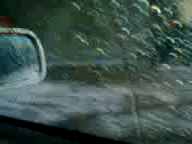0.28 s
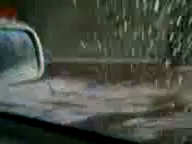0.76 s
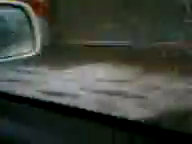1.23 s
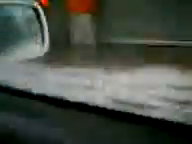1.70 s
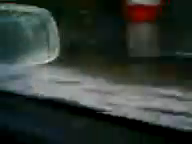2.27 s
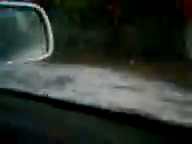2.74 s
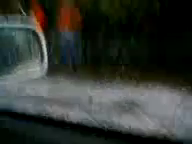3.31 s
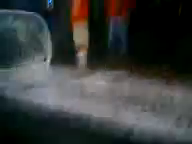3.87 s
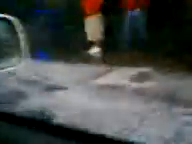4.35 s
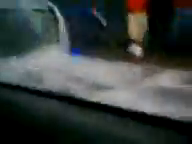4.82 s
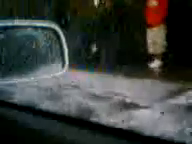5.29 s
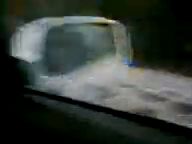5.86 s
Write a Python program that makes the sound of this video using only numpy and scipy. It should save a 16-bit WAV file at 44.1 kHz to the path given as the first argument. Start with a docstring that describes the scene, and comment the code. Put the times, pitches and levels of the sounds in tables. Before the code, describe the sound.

Hail on a car cuts in abruptly at about 0.2 seconds, heard from inside the cabin. Small stones tick densely on the windshield and drum on the padded steel roof over a hollow boom, heaviest during the first second. From about 0.6 to 2.4 seconds, larger stones crack on the glass at irregular moments, each with a short rattle and a dull knock. Some of these hits overload the small microphone, adding bright clicks to an otherwise slightly muffled sound. Around 1.2 seconds, one brief, grainy swish slides down in pitch. The shower eases to a lull near 2.9 seconds, then picks up again in gusty flurries. More hard cracks land between 3 and 3.5 seconds, from 4.1 to 5.2 seconds, and in a quick cluster near 5.9 seconds. The patter continues, a little softer, until the end at about 6 seconds.

```python
"""Hail on a car, heard from inside

Small stones tick on the windshield, drum on the padded steel roof and make the cabin boom.
The sound cuts in on a downpour already under way, which eases to a lull near 2.9 s; gusts add flurries.
The largest stones crack on the glass, with a rattle and a dull knock. One short swish slides down.
A small microphone cuts the treble. Some hard hits overload the recorder, which adds bright clicks."""
import sys
import numpy as np
from scipy import signal
from scipy.fft import rfft, irfft
from scipy.io import wavfile
from scipy.ndimage import uniform_filter1d

SR = 44100
rng = np.random.default_rng(int(sys.argv[2]) if len(sys.argv) > 2 else 0)


def int16_out(signal):
    """Quantize to a 16-bit WAV file."""
    q = np.round(np.clip(np.atleast_2d(signal).T, -1, 1) * 32767)
    wavfile.write(sys.argv[1], SR, q.astype(np.int16))


N = 267687
TIME = np.arange(N) / SR

# How strongly each part of the car answers a blow at each pitch: pitch_hz, level_db
GLASS_TONE = [(200, -32.5), (900, -18.5), (1500, -15.5), (1950, -12), (2250, -0.5), (2500, 0.5),
              (2900, -2.5), (3300, -3.5), (3600, -8), (3900, -20.5), (4300, -30.5), (4700, -59)]
ROOF_TONE = [(60, -25), (300, -12), (600, -2.5), (820, -1.5), (1150, 1.5), (1450, 4), (1780, 2),
             (2100, -4.5), (3000, -8.5), (3700, -18), (4400, -57)]


def small_hail():
    """Small stones tick on the glass and drum on the roof; both shake the air in the cabin."""
    # How strongly the cabin's air answers a blow at each pitch: pitch_hz, level_db
    cabin_tone = [(20, -38.5), (35, -23), (60, -10.5), (110, -6), (200, -5), (300, -1.5), (400, -1.5),
                  (500, 2), (700, -8), (1200, -23.5), (3000, -57)]
    # How the cabin's boom rises and falls: time_s, level_db
    boom_curve = [(0.2, -25), (0.56, -26), (0.63, -31.4), (0.85, -27), (0.99, -37), (1.3, -33.5),
                  (1.48, -36), (1.78, -32), (2.45, -34.4), (2.92, -42.0), (3.35, -33), (3.7, -37),
                  (4.5, -37.5), (4.72, -32.5), (5.15, -34), (5.62, -38.0), (6.06, -39.5)]
    boom_db = np.interp(TIME, *np.transpose(boom_curve)) - 1
    glass_db = shower_level(base_db=-24, follow=1.0, downpour_db=-3) + flurries("glass")
    # At first, heavy stones fall mostly on the roof.
    roof_db = shower_level(base_db=-29, follow=0.91, downpour_db=3.5) + flurries("roof")
    on_glass = impacts(per_s=850, spread_db=4.5, max_spreads=2.7, clump_db=0.5)
    on_roof = impacts(per_s=750, spread_db=4.0, max_spreads=3.12, clump_db=1.5)
    patter = panel(on_glass, GLASS_TONE, uneven_db=6.0, echo_db=0.5, ring_scale=1.0)
    drumming = panel(on_roof + 0.45 * on_glass, ROOF_TONE, uneven_db=5.5, echo_db=1.5, ring_scale=0.9)
    boom = panel(on_roof + 0.2 * on_glass, cabin_tone, uneven_db=2.5, echo_db=0.0, ring_scale=1.1)
    # The roof's hollow main note grows faster than the boom.
    hollow = steady(resonate(boom, pitch_hz=402, width_hz=125))
    hollow_db = -28.5 + 1.78 * (boom_db + 26)
    panels = amp(glass_db) * patter + amp(roof_db) * drumming
    return panels + amp(boom_db) * boom + amp(hollow_db) * hollow


def glass_cracks():
    """A large stone ticks sharply on the glass; the pane rattles and the bodywork gives a dull knock."""
    # Large stones on the glass, with levels trimmed below: start_s, tick_db, rattle_db, knock_db
    stones = [(0.5992, -2, -22, -27), (0.7244, -7, -22, -21), (0.7616, -6, -31, -29),
              (0.7784, -3, -21, -36), (0.8837, -3, -23, -23.5), (0.8897, -2, -22, -30),
              (0.9322, -2, -17, -31), (0.937, -8, -17.5, -37), (0.9475, -5, -14, -32),
              (1.1622, -7, -23, -23), (1.1735, -4, -21, -30), (1.1873, -3, -16, -27),
              (1.2437, -3.5, -24, -24), (1.3837, -6, -17, -18.5), (1.4044, 1, -17.5, -19),
              (1.4446, -6, -15, -28), (1.6469, -1, -15, -21.5), (1.6685, -1.5, -20, -32),
              (1.7751, -5.5, -28, -35), (2.0181, -5, -20, -22.5), (2.0984, -8, -28, -36),
              (2.318, -9, -32, -24.5), (2.3691, -1.5, -19, -41), (3.0702, -5, -19, -29),
              (3.4245, -9, -19.5, -31), (3.488, -4.5, -23, -39), (4.1131, -11, -26.5, -28.5),
              (4.1325, -8, -19.5, -50), (4.18, -10, -19, -27), (4.2904, -16, -18, -29),
              (4.489, -8, -15.5, -26), (4.5292, -6, -19.5, -37), (4.6729, -11, -24, -27),
              (4.7647, -5.5, -21.5, -30), (5.0069, -6, -19, -36), (5.0917, -5, -17, -39),
              (5.1971, -4, -24, -26), (5.2212, -5, -27, -29), (5.867, -8.5, -18.5, -37),
              (5.8935, -6, -26, -27), (5.9137, -4, -14.5, -28)]
    out = np.zeros(N)
    for start_s, tick_db, rattle_db, knock_db in stones:
        contact = tick(pitch_hz=2690, width_s=0.00047)
        add(out, start_s - len(contact) / SR / 2, amp(tick_db + 0.5) * contact)
        add(out, start_s, amp(rattle_db - 2.5) * ring(GLASS_TONE, ring_scale=1.0))
        add(out, start_s, amp(knock_db) * ring(ROOF_TONE, ring_scale=0.87))
    return out


def swish():
    """A grainy crackle swells quickly, then fades as it slides down in pitch."""
    start_s, length_s, ramp_s = 1.17, 0.2, 0.025
    fall_hz_per_s, fade_db_per_s = 12800, 54
    age_s = np.clip(TIME - start_s, 0, length_s)
    grains = impacts(per_s=1300, spread_db=4.0, max_spreads=3.4, clump_db=1.5) * rng.choice([-1, 1], N)
    crackle = resonate(grains, pitch_hz=2480 - fall_hz_per_s * age_s, width_hz=520)
    ramps = np.minimum(np.minimum(age_s, length_s - age_s) / ramp_s, 1)
    return steady(crackle, size=2000) * ramps * amp(-20.5 - fade_db_per_s * age_s)


def overload_clicks():
    """Some of the hardest hits overload the recorder, which adds a short, bright distortion click."""
    # Where the clicks are placed: start_s, peak_db
    overloads = [(0.598, -37), (0.8827, -36), (0.889, -19), (0.9312, -51), (1.4032, -25), (1.4431, -26.5),
                 (1.646, -25.5), (2.0165, -35.5), (2.368, -23.5), (3.4865, -53)]
    # How strong a click is at each pitch: pitch_hz, level_db
    click_tone = [(3000, -28), (4600, -0.5), (6500, -1), (10000, -4), (15500, -11)]
    out = np.zeros(N)
    for start_s, peak_db in overloads:
        click = pulse(click_tone, uneven_db=0.5)
        add(out, start_s + 0.0014, amp(peak_db) * click / abs(click).max())
    return out


def shower_level(base_db, follow, downpour_db):
    """A panel's level in dB follows the shower; the opening downpour shifts it, then dies away."""
    # How hard it hails: time_s, strength_db
    strength = [(0.2, 5), (0.55, 5), (0.93, 3), (1.0, 0.5), (1.2, 0.5), (1.75, 2.5), (2.15, 1.44),
                (2.6, -1), (2.87, -6), (3.0, -6), (3.12, -2.2), (3.45, -1.1), (3.92, -1.5), (4.4, -1.1),
                (4.72, 1.25), (5.25, 1.24), (5.7, -0.5), (6.06, -2.9)]
    hold_s, fade_s = 0.55, 0.28
    downpour = np.exp(-np.maximum(TIME - hold_s, 0) / fade_s)
    return base_db + follow * np.interp(TIME, *np.transpose(strength)) + downpour_db * downpour


def flurries(part):
    """Gusts throw hail at the car, briefly changing the level in dB on the glass or the roof."""
    # One flurry a row: start_s, length_s, glass_change_db, roof_change_db
    gusts = [(0.442, .17, 3.5, 0), (1.164, 0.11, 2.5, -0.5), (1.368, 0.19, 1, 4), (1.65, 0.11, 1.5, -1),
             (2.467, 0.2, 2.5, 2.5), (2.95, .11, -3, 5.5), (3.049, 0.14, 3, 2), (3.39, 0.13, 3, 1),
             (3.576, 0.077, 3.5, 2), (4.475, 0.086, 0.5, -3.5), (4.592, .1, 2, 0.5), (4.699, .1, 0, 2.5),
             (4.868, 0.067, -1.5, 3.5), (5.15, 0.096, 1.5, 2), (5.855, 0.066, 0.5, -0.5),
             (5.961, 0.061, 6, 0.5)]
    ramp_s = 0.015
    change_db = np.zeros(N)
    for start_s, length_s, glass_db, roof_db in gusts:
        inside_s = np.minimum(TIME - start_s, start_s + length_s - TIME)
        change_db += (glass_db if part == "glass" else roof_db) * np.clip(inside_s / ramp_s, 0, 1)
    return change_db


def impacts(per_s, spread_db, max_spreads, clump_db):
    """Blows land at random, many small and few large, in brief louder and softer clumps."""
    slow_filter = signal.butter(2, 28, fs=SR, output="sos")
    clumps = unit(signal.sosfilt(slow_filter, rng.standard_normal(N)))
    size_db = spread_db * np.minimum(rng.exponential(1, N), max_spreads) + clump_db * clumps
    return amp(size_db) * (rng.random(N) < per_s / SR)


def panel(hits, tone, uneven_db, echo_db, ring_scale, spots=32):
    """Blows scatter over a panel; each spot answers with its own pulse and echoes."""
    where = rng.integers(0, spots, N)
    pushes = hits * rng.choice([-1, 1], N)  # each blow pushes in or out at random
    out = np.zeros(N)
    for spot in range(spots):
        paths = amp(echo_db) * echoes(ring_scale)
        paths[0] += 1  # the sound that arrives directly
        blow = signal.fftconvolve(paths, pulse(tone, uneven_db))
        blow /= np.linalg.norm(blow)
        out += signal.oaconvolve(pushes * (where == spot), blow)[:N]
    return steady(out)


def tick(pitch_hz, width_s, size=200):
    """A hard stone touches the glass: two or three quick swings, centred on the middle sample."""
    t = (np.arange(size) - size // 2) / SR
    detune, phase = rng.random(2) - 0.5
    cycles = pitch_hz * (1 + 0.16 * detune) * t + phase
    return np.exp(-(t / width_s) ** 2) * np.cos(2 * np.pi * cycles)


def ring(tone, ring_scale):
    """Part of the car rings on after a large stone, starting at an average level of 1."""
    sound = signal.fftconvolve(echoes(ring_scale), pulse(tone, uneven_db=2.5))
    return sound / np.sqrt(np.mean(sound[:500] ** 2))


def pulse(tone, uneven_db, size=2048):
    """A short pulse with the given tone; each one favours different pitches at random."""
    hz = np.fft.rfftfreq(size, 1 / SR)
    grid_hz = np.arange(0, 6000, 300)
    bumps = np.interp(hz, grid_hz, rng.standard_normal(len(grid_hz)))
    gain_db = at_pitch(tone, hz) + uneven_db * bumps
    # Keep this tone but pack its energy right at the start (minimum phase).
    cepstrum = irfft(np.log(amp(gain_db)))
    cepstrum[1:size // 2] *= 2
    cepstrum[size // 2 + 1:] = 0
    return irfft(np.exp(rfft(cepstrum)))


def echoes(ring_scale, size=4096):
    """Sound bounces around the panel and cabin and dies away; its total energy is 1."""
    # Time the cabin takes to fade by 60 dB, before ring_scale stretches it: pitch_hz, fade_s
    fade_times = [(100, 0.1), (400, 0.081), (1200, 0.1), (4000, 0.061)]
    hz, t, bands = signal.stft(rng.standard_normal(size), SR, nperseg=128)
    fade_s = ring_scale * at_pitch(fade_times, hz)[:, None]
    fading = bands * amp(-60 * t / fade_s)
    tail = signal.istft(fading, SR, nperseg=128)[1][:size]
    return tail / np.linalg.norm(tail)


def resonate(x, pitch_hz, width_hz):
    """Two resonances in a row pick out the sound near one pitch, which may slide."""
    turn = np.exp(2j * np.pi * np.cumsum(pitch_hz * np.ones(len(x))) / SR)
    decay = np.exp(-np.pi * width_hz / SR)
    for _ in range(2):
        x = 2 * (turn * signal.lfilter([1 - decay], [1, -decay], x / turn)).real
    return x


def low_pass(x, edge_hz):
    """Cuts away the sound above edge_hz."""
    taps = signal.firwin(511, edge_hz, window=("kaiser", 9), fs=SR)
    return signal.oaconvolve(x, taps[None], "same")


def steady(x, size=8000):
    """Holds the average level at 1 while single blows still stand out."""
    return x / np.sqrt(abs(uniform_filter1d(x ** 2, size=size)) + 1e-12)


def amp(db):
    """Turns decibels into a gain."""
    return 10 ** (np.asarray(db) / 20)


def unit(x):
    """Scales a sound to an average (rms) level of 1."""
    return x / np.sqrt(np.mean(x ** 2) + 1e-20)


def at_pitch(table, hz):
    """Reads between a table's rows, with pitch spaced in octaves."""
    pitch_hz, values = np.transpose(table)
    return np.interp(np.log(hz + 1), np.log(pitch_hz + 1), values)


def add(mix, start_s, sound):
    """Mixes a sound in at start_s."""
    part = mix[max(round(start_s * SR), 0):][:len(sound)]
    part += sound[:len(part)]


def scene():
    """The hail on the car, heard at one place in the cabin."""
    return (small_hail() + glass_cracks() + swish())[None]


def record(dry):
    """The recorder cuts in, rounds off peaks and loses the treble; its overload clicks go on top."""
    start_s, rise_s, ceiling = 0.2, 0.0069, 0.72
    switched_on = np.clip((TIME - start_s) / rise_s, 0, 1)
    rounded = dry / (1 + (dry / ceiling) ** 6) ** (1 / 6)
    muffled = low_pass(rounded * switched_on, edge_hz=4680)
    return low_pass(muffled + overload_clicks(), edge_hz=15900)


dry = scene()
out = record(dry)
int16_out(out)
```